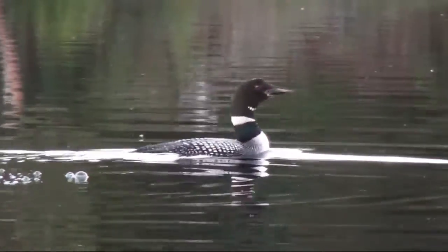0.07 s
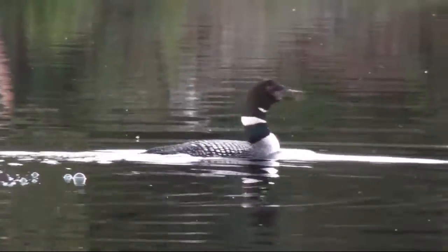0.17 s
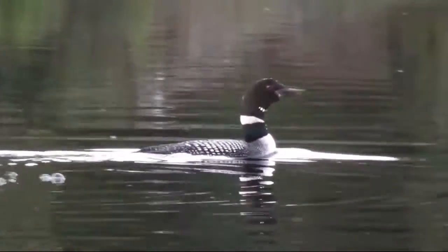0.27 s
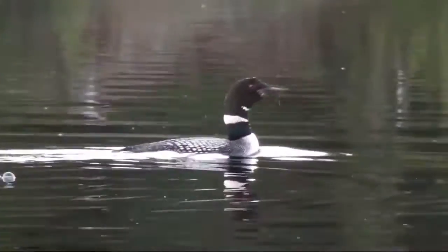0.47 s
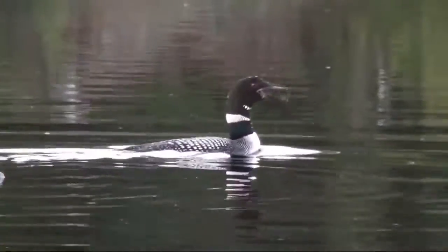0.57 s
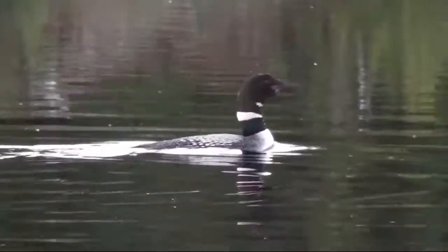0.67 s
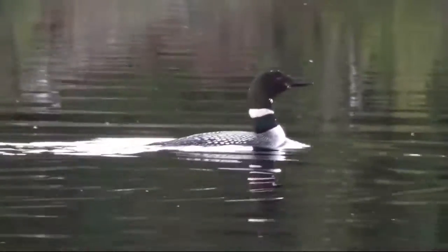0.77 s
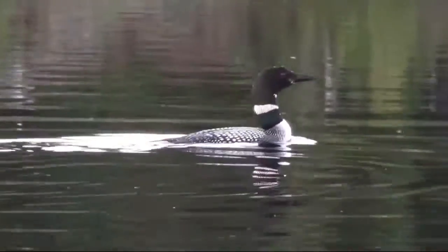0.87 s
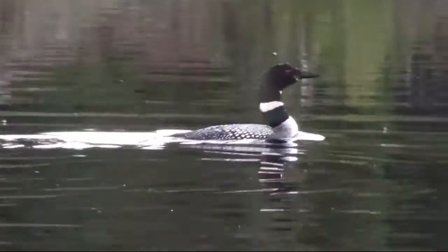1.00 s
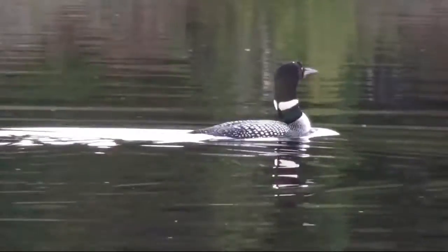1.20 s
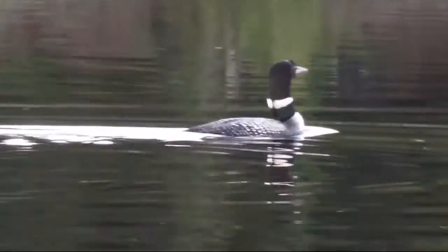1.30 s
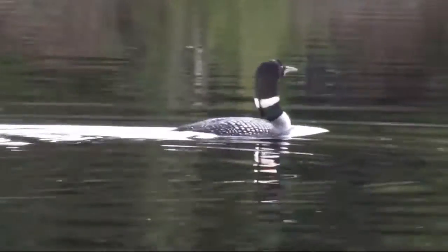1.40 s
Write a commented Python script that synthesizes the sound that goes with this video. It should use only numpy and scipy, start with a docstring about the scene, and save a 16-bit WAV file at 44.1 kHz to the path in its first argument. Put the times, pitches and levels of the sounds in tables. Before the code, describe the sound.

A loon's tremolo call over a quiet lake. Faint murmur and the fading echo of an earlier call, more from the right, come first. At 0.15 s a soft lead-in rises to a low note near 0.25, then leaps at 0.29 to a clear, flutelike tone pulsing higher five times, ten per second, until 0.9. Dull, smeared echoes from the left follow from about 0.7, with a faint distant hoot.

```python
"""A loon on a still lake gives one tremolo call: a soft rising lead-in, a low opening note, then a higher
tone that quavers five times and trails off. Both are sums of harmonics, with breath noise that follows them.
The wooded far shore, to the left, returns a smeared echo half a second late, and an earlier call still echoes
from the right: both are the voice passed through decaying noise. Bands of noise make a low murmur and hiss,
with a faint far tone of narrow noise. The recorder mirrors tones around multiples of 3.9 kHz."""
import sys
import numpy as np
from scipy import signal
from scipy.io import wavfile
from scipy.ndimage import uniform_filter1d

SR = 44100
rng = np.random.default_rng(int(sys.argv[2]) if len(sys.argv) > 2 else 0)


def transcribe(u):
    """Save the signal u as a 16-bit wav file named by the first command-line argument.

    u: samples, shape (n,) or (channels, n), limited to [-1, 1]; the rate is SR.
    q: integer samples, one column per channel.
    """
    v = np.clip(np.atleast_2d(u).T, -1, 1)
    q = np.round(v * 32767).astype(np.int16)
    wavfile.write(sys.argv[1], SR, q)


def gain_from_db(level_db):
    """Convert decibel levels to linear amplitude factors (20 dB per decade)."""
    decades = np.asarray(level_db, float) / 20
    return 10 ** decades


N = 63945
T = np.arange(N) / SR   # time in seconds
SIDES = np.array([[.5], [-.5]])   # shares a left-over-right difference in dB between the two sides
JITTER_HZ, UPPER_ROUGH_DB = 2.5, 3.5   # typical chance wander of the pitch and of the upper harmonics


def rms_one(x):
    """Scale a sound to an average strength (rms) of 1."""
    return x / np.sqrt(np.mean(x ** 2) + 1e-20)


def in_time(rows):
    """Join the rows of a table by straight lines in time, one curve for each column after the first."""
    seconds, *columns = np.transpose(rows)
    return [np.interp(T, seconds, column) for column in columns]


def soften(x):
    """Round the corners of a curve by averaging twice over 4 ms."""
    return uniform_filter1d(uniform_filter1d(x, size=175), size=175)


def drift(rate_hz):
    """Slow chance: noise with its changes faster than the rate smoothed away, typical size 1."""
    r = np.exp(-2 * np.pi * rate_hz / SR)
    smooth = signal.lfilter([1], [1, -2 * r, r * r], rng.standard_normal(N + SR))
    return rms_one(smooth[SR:])


def bump(centre, half, squareness):
    """A swell of height 1 that falls to one half at the half width; more squareness flattens its top."""
    return np.exp(-np.log(2) * np.abs((T - centre) / half) ** squareness)


def at_pitch(rows, hz):
    """Read a two-column table at one frequency, along a logarithmic pitch scale."""
    table = np.array(rows)
    return np.interp(np.log(hz), np.log(table[:, 0]), table[:, 1])


def banded_noise(spectrum, patchy_db):
    """Half-octave bands of stereo noise, each with its own level, flicker and likeness of sides; rms 1."""
    # How alike the two sides are. Each row: frequency in Hz, likeness from 0 (unrelated) to 1 (the same).
    likeness = [(40, .65), (125, .86), (250, .94), (800, .95), (3000, .98), (10800, .99)]
    edges = 20 * 2 ** np.arange(0, 9.6, .5)
    white = rng.standard_normal((2, 2, N + SR // 2))
    out = 0
    for k, (low, high) in enumerate(zip(edges, edges[1:])):
        band = signal.butter(2, [low, high], "band", fs=SR, output="sos")
        mid, side = signal.sosfilt(band, white[k % 2])[:, -N:]
        centre = np.sqrt(low * high)
        alike = np.clip(at_pitch(likeness, centre), 0, 1)
        stereo = np.sqrt(1 + alike) * mid + np.sqrt(1 - alike) * side * [[1], [-1]]
        out = out + gain_from_db(at_pitch(spectrum, centre) + patchy_db * drift(12.0)) * stereo
    return rms_one(out)


def murmur():
    """The low murmur and hiss under all: noise strongest in the low bands, with a slight flicker."""
    # Balance of the murmur. Each row: frequency in Hz, relative level in dB per Hz.
    spectrum = [(20, -7), (60, -7.5), (120, -3), (230, 1), (330, -12.5), (600, -4.5), (850, -14.5),
                (1500, -15), (3000, -22.5), (6000, -23), (11000, -25)]
    return gain_from_db(-57) * banded_noise(spectrum, patchy_db=1.3)


def hoot():
    """A faint narrow tone far off: noise ringing through the same resonance twice."""
    # Loudness of the far tone. Each row: time in seconds, level in dB.
    hoot_rows = [(0, -74.5), (.6, -61.5), (.66, -56), (.9, -57), (1.05, -63.5), (1.45, -66.5)]
    tone_hz, width_hz = 478.6, 34   # width of each of the two passes
    r, w = np.exp(-np.pi * width_hz / SR), 2 * np.pi * tone_hz / SR
    x = rng.standard_normal(N + SR)
    for _ in range(2):
        x = signal.lfilter([1, 0, -1], [1, -2 * r * np.cos(w), r * r], x)
    return gain_from_db(in_time(hoot_rows)[0]) * rms_one(x[SR:])


def scatter(x, delay, build, t60, own, first_db=0):
    """Countless small reflectors return a sound late and smeared, as noise that builds up and dies away.

    Times are in seconds; t60 is the time to fade by 60 dB, own the share that differs between the sides."""
    t = np.arange(4 * SR) / SR - delay
    first_stretch = np.exp(-(t / .25) ** 4)   # about the first quarter second
    fade_db = -60 * np.clip(t, 0, None) / t60
    shape = np.clip(t / build, 0, 1) * gain_from_db(fade_db + first_db * first_stretch)
    shared, left, right = rng.standard_normal((3, len(t)))
    response = shape * (shared + own * np.array([left, right])) / np.sqrt(np.sum(shape ** 2))
    return signal.fftconvolve(x[None], response, axes=1)


def far_shore(voice):
    """The wooded shore returns a dulled echo from the left; an earlier call's tail comes from the right."""
    echo_left_db, earlier_left_db = 5.5, -9
    earlier_call_s, earlier_db = 1.7, 1.5   # how long ago the earlier call began, and its extra level
    middle = signal.butter(1, [600, 1400], "band", fs=SR, output="sos")
    dull = signal.sosfilt(middle, voice)
    far = gain_from_db(-33) * scatter(dull, delay=.53, build=.03, t60=5.1, own=.5, first_db=5)
    ago = int(earlier_call_s * SR)
    # The earlier call is the same call, heard further along its echo.
    earlier = far[:, ago:ago + N] * gain_from_db(earlier_db + SIDES * earlier_left_db)
    return far[:, :N] * gain_from_db(SIDES * echo_left_db) + earlier


def near_scatter(voice):
    """A short faint smear of the voice from reflectors close by."""
    return gain_from_db(-35) * scatter(voice, delay=.004, build=.03, t60=.2, own=1.0)[:, :N]


def breath(loudness):
    """Air noise that grows a little faster than the voice, plus a puff as the opening note breaks out."""
    # Balance of the breath before the notch. Each row: frequency in Hz, relative level in dB per Hz.
    spectrum = [(300, -7.5), (1000, 1.5), (2000, -5.5), (2800, 3.5), (3700, -12.5), (4800, -0.5),
                (6300, -4), (7700, -23), (9000, -15), (11000, -3.5)]
    noise = banded_noise(spectrum, patchy_db=2.2)[0]
    notch = signal.butter(1, [3400, 3950], "bandstop", fs=SR, output="sos")
    puff = gain_from_db(-56) * bump(.216, .010, 2)
    return (gain_from_db(-27.5) * loudness ** 1.25 + puff) * signal.sosfilt(notch, noise)


def opening():
    """Soft lead-in, then a low note with a strong second harmonic; returns sound and loudness."""
    # Lead-in and opening note. Each row: time in seconds, pitch in Hz, levels of harmonics 1, 2 and 3 in dB.
    opening_rows = [(.14, 430, -83, -85, -92), (.152, 435, -52.5, -60.5, -85),
                    (.17, 464.4, -50, -48.5, -72), (.182, 454.3, -48, -44, -78),
                    (.194, 537.4, -45, -55, -81), (.204, 633, -55, -59, -79.5),
                    (.213, 644, -27.5, -43, -49), (.226, 698.4, -22, -25, -45.5),
                    (.242, 752.6, -20, -16.5, -31), (.256, 759.6, -22, -16.5, -31),
                    (.266, 756.5, -19, -20, -35.5), (.277, 764, -27.5, -31.5, -43),
                    (.287, 740, -35.5, -46, -69)]
    # Harmonics 4 to 9 when the second is loudest, before chance wander: one level in dB for each.
    upper_levels = [-79, -61.5, -49, -52, -56, -72]
    hz, *levels = [soften(column) for column in in_time(opening_rows)]
    on = soften(1. * (T > opening_rows[0][0]) * (T < opening_rows[-1][0]))
    phase = 2 * np.pi * np.cumsum(hz + JITTER_HZ * drift(40.0)) / SR
    # The upper harmonics rise and fall with the second.
    swell_db = levels[1] - levels[1].max()
    levels += [swell_db + db + UPPER_ROUGH_DB * drift(90.0) for db in upper_levels]
    tone = sum(gain_from_db(db) * np.cos((k + 1) * phase + k * np.pi) for k, db in enumerate(levels))
    return np.sqrt(2) * on * tone, on * np.hypot(gain_from_db(levels[0]), gain_from_db(levels[1]))


def tremolo():
    """Pulses of breath pressure lift pitch, level and harmonics; returns tone, harmonics and loudness."""
    # The held tone under the quavers. Each row: time in seconds, pitch in Hz, level in dB.
    held_rows = [(.279, 997.2, -62), (.287, 996.3, -23.5), (.292, 977, -20.5), (.297, 955, -21),
                 (.306, 961.3, -23.5), (.335, 970, -25), (.385, 968.1, -23.5), (.403, 946.4, -25),
                 (.42, 974.6, -21.5), (.485, 982.3, -21), (.504, 967, -24.5), (.55, 988.3, -25),
                 (.602, 978, -24), (.65, 980.8, -20), (.70, 976, -21.5), (.78, 963.5, -23.5),
                 (.815, 933.4, -24), (.85, 954, -22.5), (.875, 984, -20), (.892, 958, -22),
                 (.906, 907, -31.5), (.935, 910, -54.5), (.95, 900, -101)]
    # Pulses of breath pressure. Each row: centre in seconds, half width of the pitch rise in seconds,
    # pitch rise in Hz, level rise in dB, change of the second harmonic in dB.
    quavers = [(0.3517, .0265, 211.7, 13, 0), (.452, .030, 224.5, 11, -1),
               (0.552, 0.028, 225.7, 14.5, -3.5), (0.6534, .0275, 220.7, 10, -5.5),
               (0.7605, 0.026, 189.5, 10.5, -5)]
    # Harmonics above the tone. Each row: multiple of the pitch, level against the tone at least effort in dB,
    # gain at full effort in dB, power of the curve between (no unit).
    harmonics = [(2, -47.5, 31.5, 0.4), (3, -39.5, -7.5, 1.9), (4, -57.5, 9.5, 0.28),
                 (5, -56.5, 13.5, 0.42), (6, -81, 22, 1.2), (7, -70.5, 29, 0.88), (8, -90, 15, 1.2)]
    throat_hz, throat_width_hz, throat_db = 4300, 420, 18   # a resonance that lifts harmonics near it
    least_effort_db, full_effort_db = -24, -10
    level_wider = 1.345   # the level swells last longer than the pitch rises

    hz, db = [soften(column) for column in in_time(held_rows)]
    hz = hz + sum(rise * bump(s, half, 3.3) for s, half, rise, *_ in quavers) + JITTER_HZ * drift(60.0)
    pressure = [bump(s, half * level_wider, 2.8) for s, half, *_ in quavers]
    shimmer_db = .25 * drift(93.0)
    db = db + sum(p * q[3] for p, q in zip(pressure, quavers)) + shimmer_db
    bright_db = sum(p * q[4] for p, q in zip(pressure, quavers))
    effort = np.clip((db - least_effort_db) / (full_effort_db - least_effort_db), 0, 1)

    phase = 2 * np.pi * np.cumsum(hz) / SR
    upper = 0
    for k, rest_db, gain_db, power in harmonics:
        resonance_db = throat_db * np.exp(-((k * hz - throat_hz) / throat_width_hz) ** 2)
        if k == 2:
            own_db = bright_db + 1.2 * drift(40)
        else:
            own_db = UPPER_ROUGH_DB * drift(90)
        upper += gain_from_db(rest_db + gain_db * effort ** power + resonance_db + own_db) * np.sin(k * phase)
    # A brief low blip as the call trails off.
    blip = gain_from_db(-45) * bump(.921, .008, 2) * np.cos(2 * np.pi * 610 * T)
    loud = gain_from_db(db) * (T > held_rows[0][0]) * (T < held_rows[-1][0])
    return np.sqrt(2) * loud * np.cos(phase), np.sqrt(2) * (loud * upper + blip), loud


def scene():
    """Voice with breath, near scatter, far-shore echoes and the lake's floor of murmur and far tone."""
    # Balance of the held tone. Each row: time in seconds, level of left over right in dB.
    tone_left = [(.29, -2.5), (.335, -5), (.37, -3), (.40, -1), (.46, .5), (.55, 1.6), (.60, .6),
                 (.66, 1.6), (.71, -.2), (.76, 1.2), (.80, .2), (.86, 1.3), (.95, 1)]
    voice_left_db = 0.64   # for everything else in the call
    low, low_loud = opening()
    tone, upper, high_loud = tremolo()
    voice = low + tone + upper
    air = breath(low_loud + high_loud)
    direct = (low + upper + air) * gain_from_db(SIDES * voice_left_db)
    direct = direct + tone * gain_from_db(SIDES * soften(in_time(tone_left)[0]))
    return direct + near_scatter(voice) + far_shore(voice) + hoot() + murmur()


def top_cut(x):
    """Nothing passes above the cut-off."""
    return signal.sosfilt(signal.butter(12, 11370, fs=SR, output="sos"), x)


def record(dry):
    """A tiny periodic timing wobble mirrors each tone, the more the higher; then the top is cut."""
    # Mirrors around 1, 2 and 3 times mirror_hz: typical level of each against a tone at even_hz, in dB.
    mirror_levels = [-33.5, -39, -44]
    mirror_hz, even_hz, flutter_db = 3899, 1200, 3
    # A small shift in time adds the slope of the sound times the shift.
    slope = np.gradient(dry, axis=1) * SR / (2 * np.pi * even_hz)
    wobble = 0
    for k, db in enumerate(mirror_levels):
        strength = 2 * gain_from_db(db + flutter_db * drift(57))
        wobble = wobble + strength * np.cos(2 * np.pi * (k + 1) * mirror_hz * T)
    low_pass = signal.ellip(12, .5, 85, 10950, fs=SR, output="sos")
    mix = signal.sosfilt(low_pass, dry + slope * wobble)
    return top_cut(mix)


dry = scene()
out = record(dry)
transcribe(out)
```